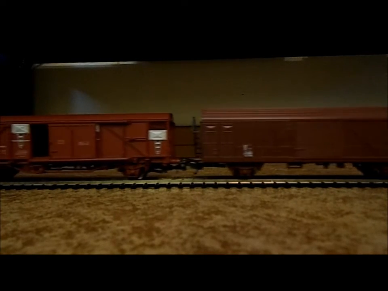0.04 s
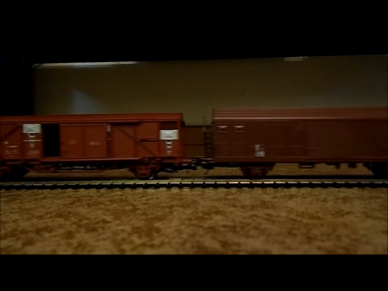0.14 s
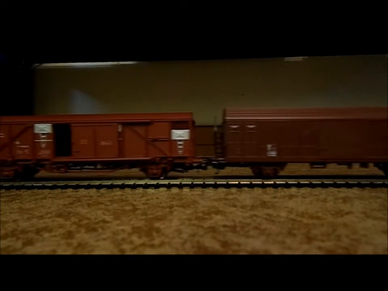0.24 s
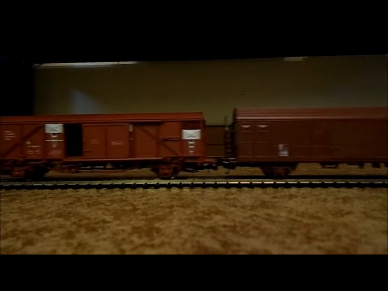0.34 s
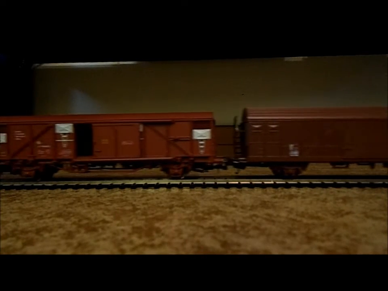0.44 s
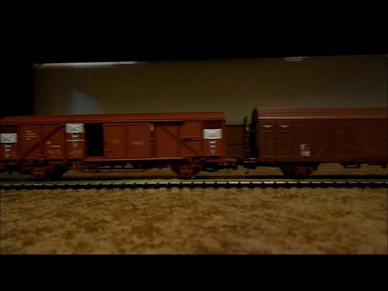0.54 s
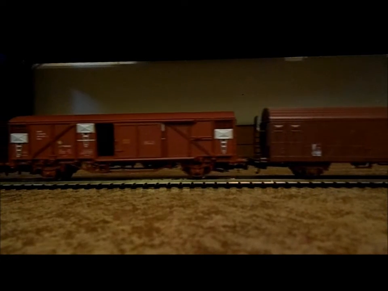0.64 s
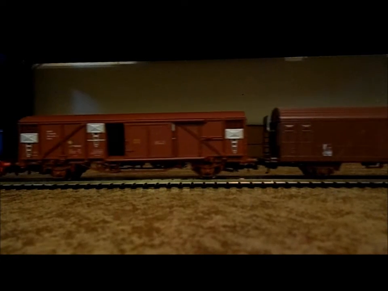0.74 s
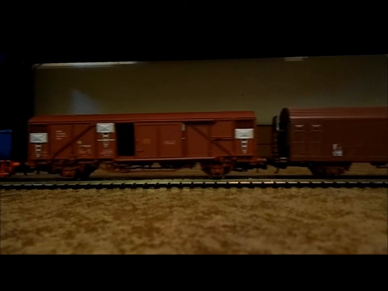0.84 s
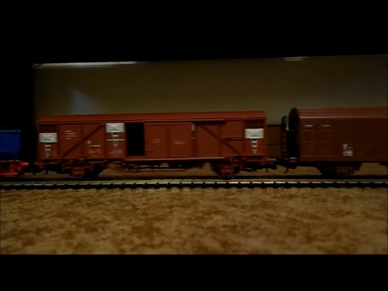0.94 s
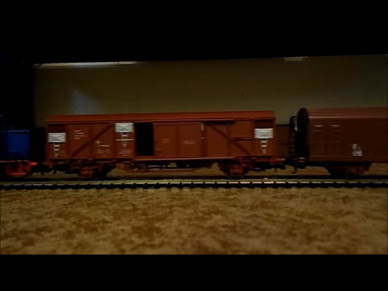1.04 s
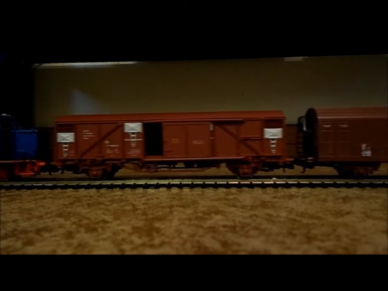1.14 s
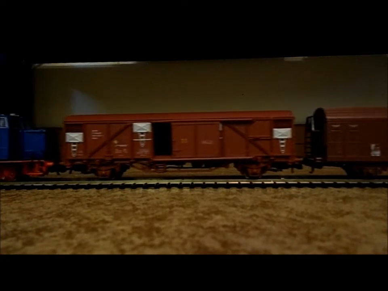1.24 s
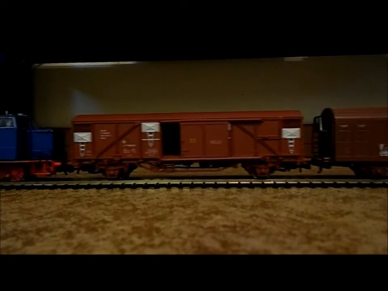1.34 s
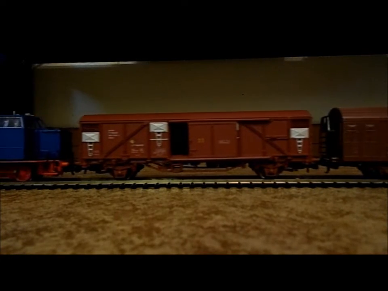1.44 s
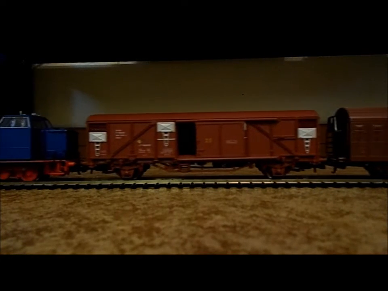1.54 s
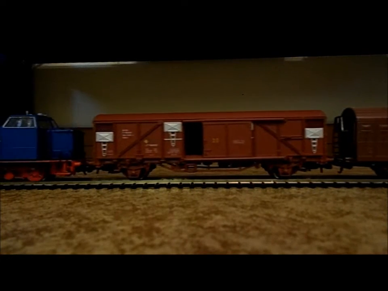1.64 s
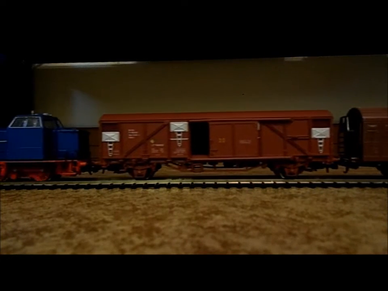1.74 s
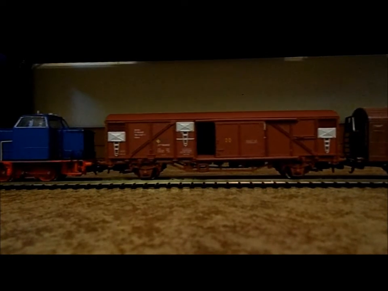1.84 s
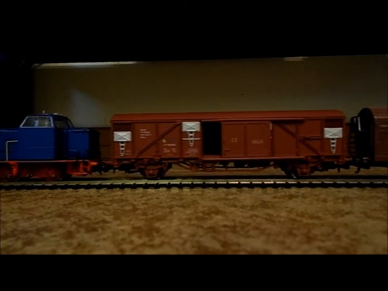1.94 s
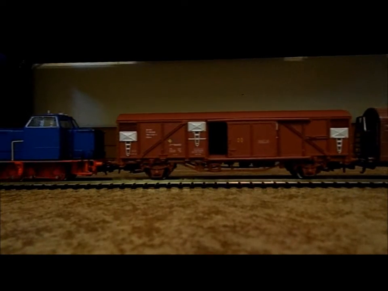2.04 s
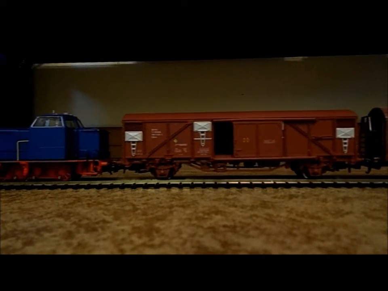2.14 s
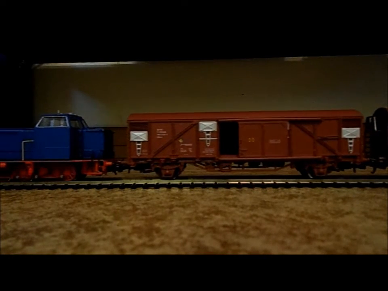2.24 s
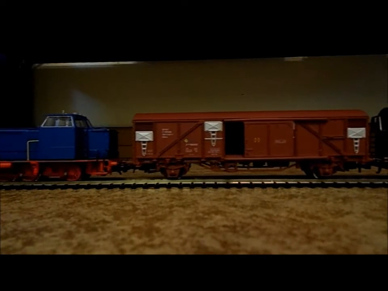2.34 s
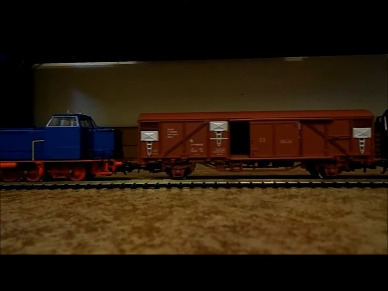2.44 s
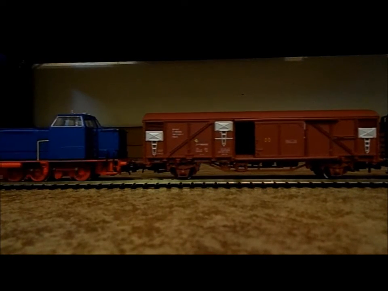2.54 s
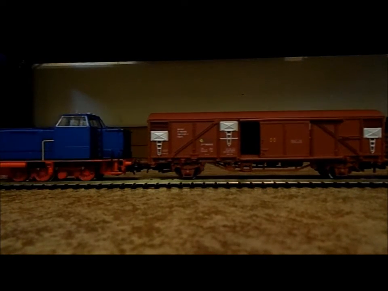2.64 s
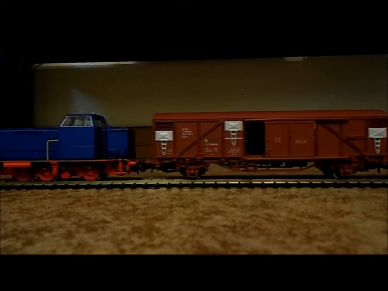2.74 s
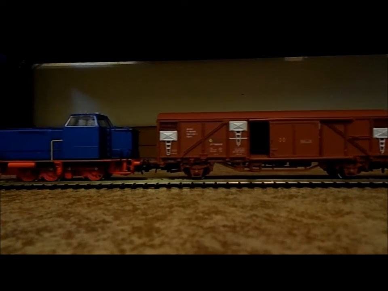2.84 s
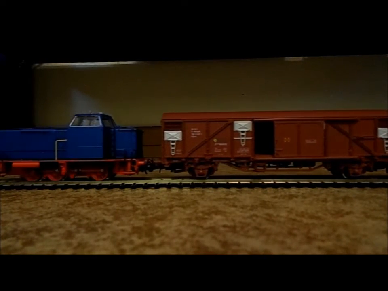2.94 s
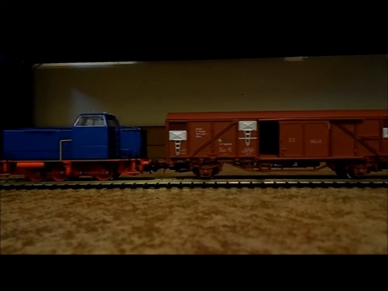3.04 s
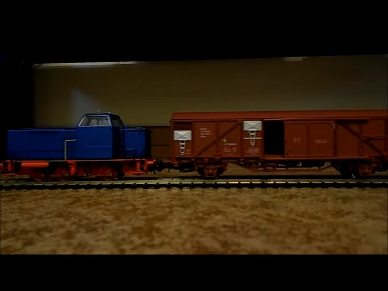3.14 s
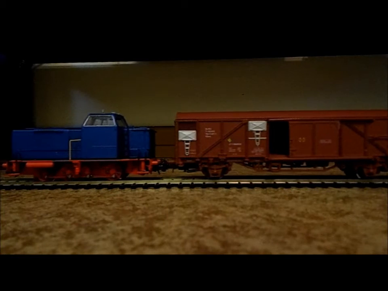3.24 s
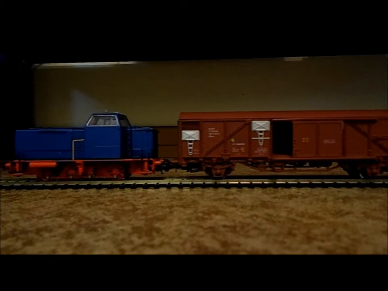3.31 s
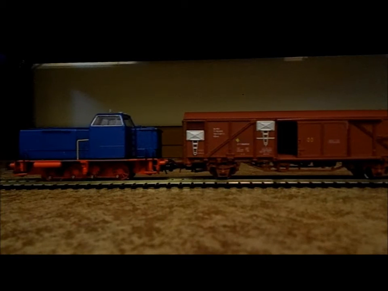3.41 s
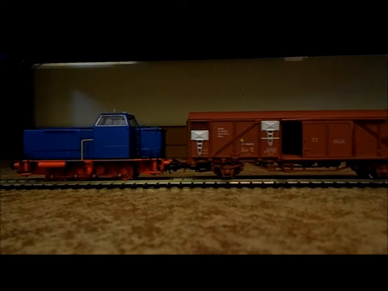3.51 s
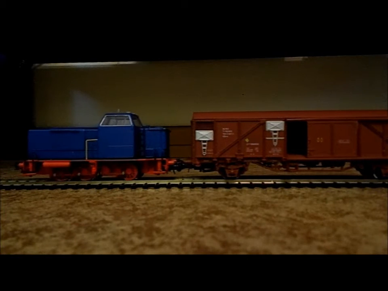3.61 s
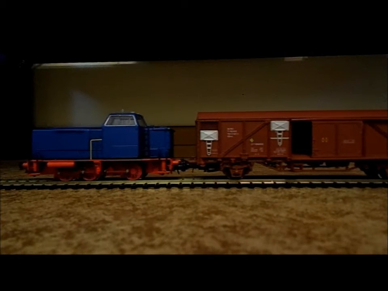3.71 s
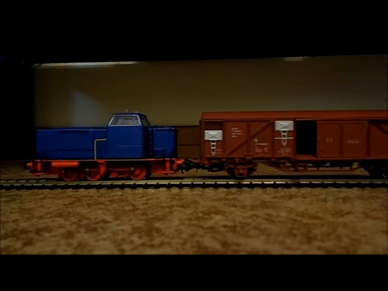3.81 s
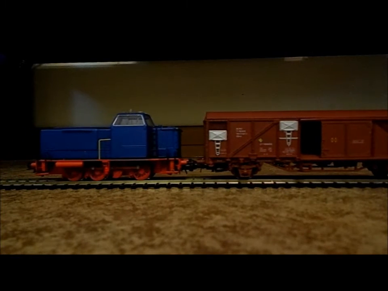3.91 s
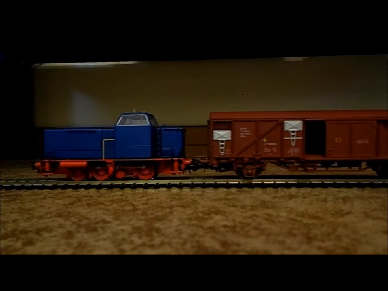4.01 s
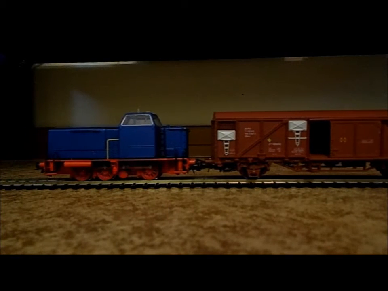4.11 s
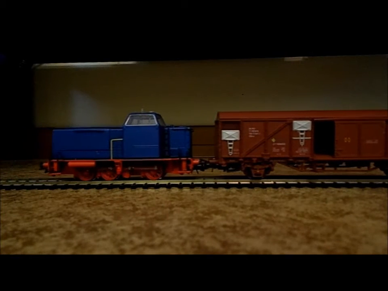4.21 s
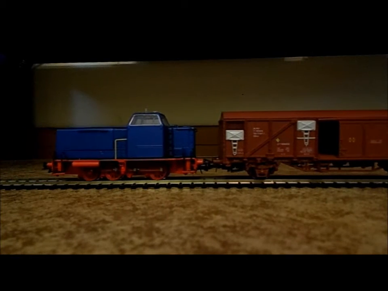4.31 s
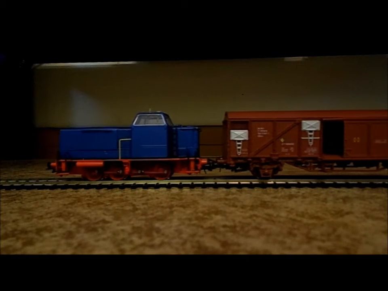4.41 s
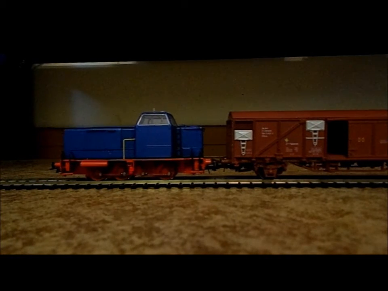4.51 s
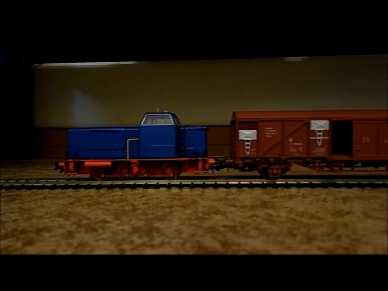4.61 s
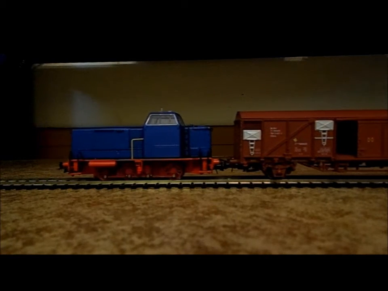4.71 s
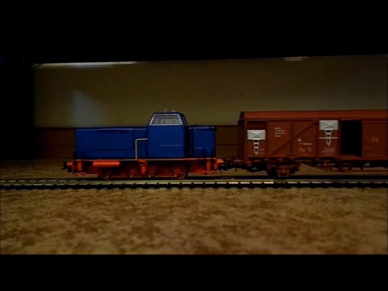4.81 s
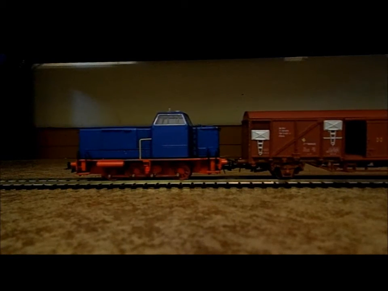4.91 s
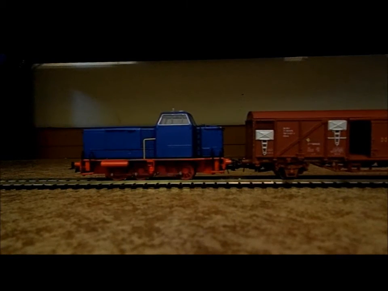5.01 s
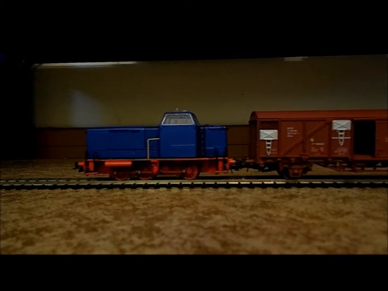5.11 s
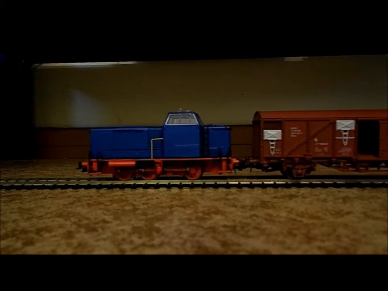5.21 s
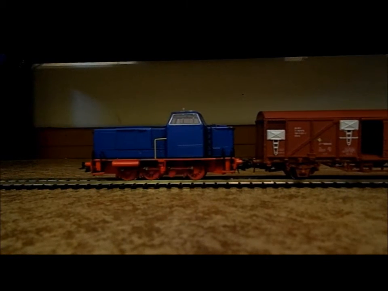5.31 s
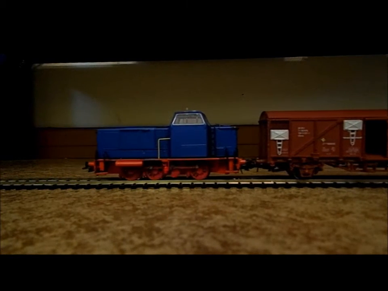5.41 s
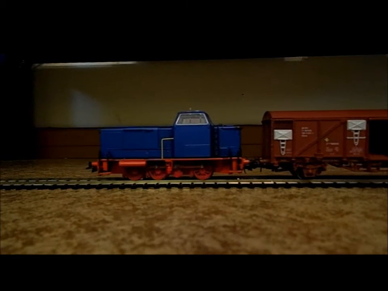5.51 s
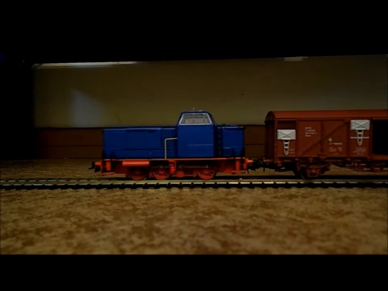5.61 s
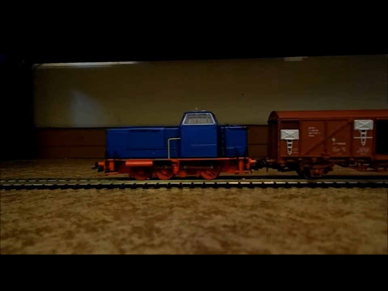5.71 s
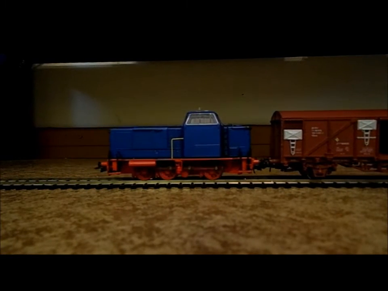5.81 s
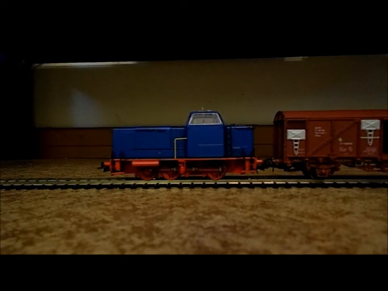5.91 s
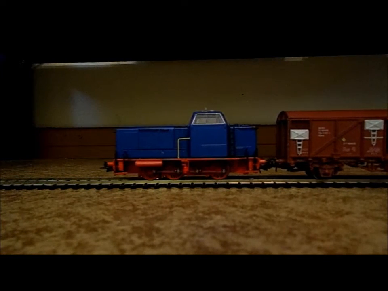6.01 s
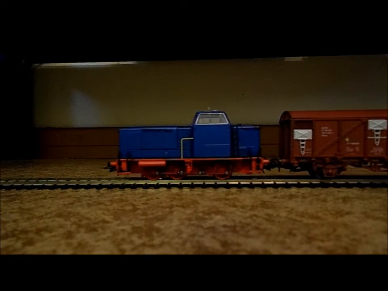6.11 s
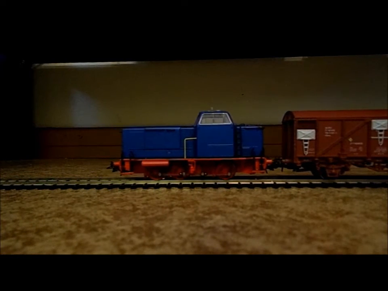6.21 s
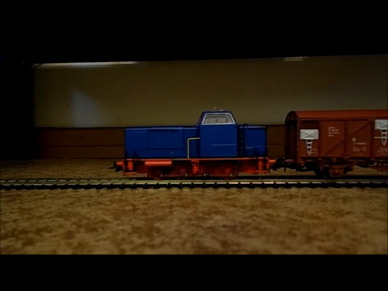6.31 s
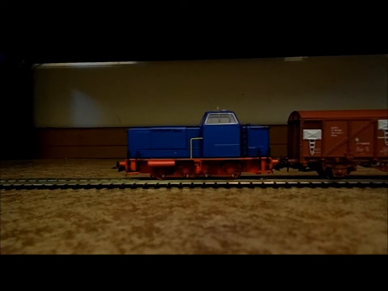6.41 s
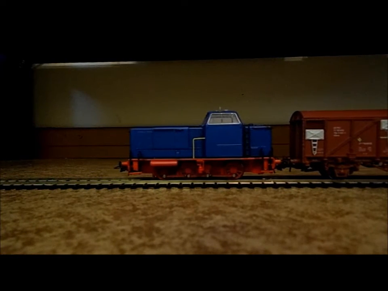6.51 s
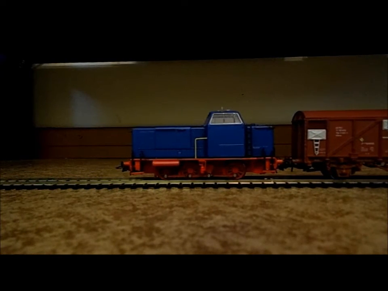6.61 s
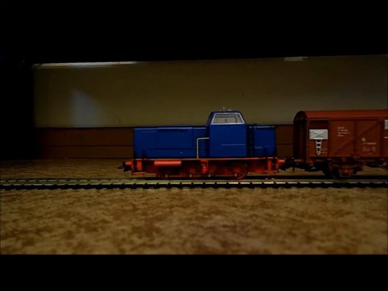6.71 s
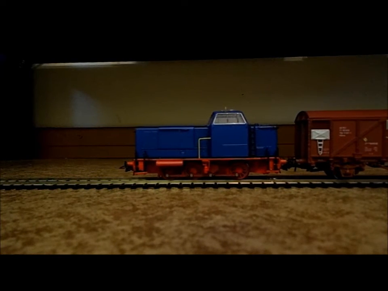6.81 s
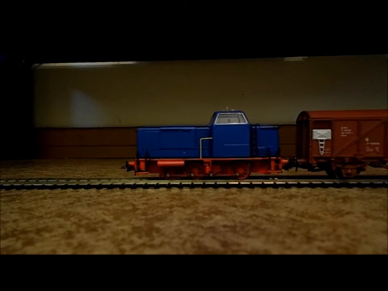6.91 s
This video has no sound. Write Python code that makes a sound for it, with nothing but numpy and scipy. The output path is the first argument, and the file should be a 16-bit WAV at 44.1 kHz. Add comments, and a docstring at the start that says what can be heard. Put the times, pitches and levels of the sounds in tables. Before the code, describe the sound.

A model locomotive's electric motor buzzes at a steady pitch while brushes scrape and wheels roll, slowing to a crawl over a deep throbbing drone.

```python
"""A model locomotive's motor buzzes at multiples of its chopped current, with side tones from five armature slots.
Filtered noise gives brushes that scrape and tick and wheels that roll and knock on rail joints, slowing to a crawl.
A gliding sine with a weak octave makes a deep far-off drone, and a steadier hum beats with it. Thin steady tones,
a low rumble and hiss lie beneath, and short swelling sines make clock-like pips."""
import sys
import numpy as np
from scipy import signal
from scipy.io import wavfile
from scipy.ndimage import uniform_filter1d

SR = 44100
rng = np.random.default_rng(int(sys.argv[2]) if len(sys.argv) > 2 else 0)


def gain_from_db(level_db):
    """Convert decibel levels to linear amplitude factors (20 dB per decade)."""
    decades = np.asarray(level_db, float) / 20
    return 10 ** decades


def store_wav(level_fs):
    """Save 16-bit WAV to argv[1]."""
    pcm = np.round(np.clip(np.atleast_2d(level_fs), -1, 1) * 32767)
    wavfile.write(sys.argv[1], SR, pcm.T.astype(np.int16))


N = 306495  # length in samples

# Rotation of the motor shaft. Each row: time in seconds, speed in turns per second.
SHAFT_SPEED = [(0.0, 83.3), (0.62, 78.23), (1.24, 64.67), (1.74, 47.53), (2.11, 40.49), (2.73, 33.16),
               (3.23, 35.24), (3.35, 31.98), (3.6, 33.38), (4.1, 28.82), (4.34, 30.91), (4.59, 31.1),
               (4.96, 29.18), (5.21, 26.35), (5.58, 24.61), (6.33, 23.03), (6.58, 15.22), (6.95, 11.26)]
# Low multiples of the chopping rate. Each row: multiple, level in dB relative to the buzz level.
BUZZ_MULTIPLES = [(1, -15), (2, -18), (3, -16.5), (4, -1), (5, -7.5), (6, -14), (7, -20), (8, -11.5),
                  (9, -1), (10, -6), (11, -3), (12, -9), (13, -9), (14, -13.5), (15, -22.5), (16, -29),
                  (17, -17.5), (18, -18), (19, -21), (20, -25), (21, -18.5), (22, -28.5), (23, -19),
                  (24, -21.5)]
# Envelope of the higher multiples. Each row: frequency in Hz, level in dB before the shell's coloration.
BUZZ_TREBLE = [(3900, -77), (4600, -95), (5500, -77.5), (6300, -84.5), (6900, -90), (7900, -76),
               (9000, -83.5), (10000, -82), (11500, -86), (12900, -82), (13600, -94), (14600, -84),
               (15600, -80.5)]
# Coloration by the shell as the engine rolls into the open and then labours. Each row: time in seconds,
# gain in dB near 1.4 kHz, near 1.7 kHz and near 2.1 kHz, gain of the slot ripple in dB.
SHELL_GAINS = [(0, -5, -18, -9, -5), (.7, -7.5, -21, -3, -3), (1.3, -1.5, -5, -14, 0.5),
               (2, -5.5, -4, -5.5, -4), (3.3, -3.5, -1, -10.5, -9), (3.8, -8, 1, -3.5, -2),
               (4.3, -6, -1, -12, -3), (4.8, -3, -0.5, -8.5, -3), (6.2, -5.5, -4.5, -2.5, -4),
               (6.4, -3.5, -2, 1, -3), (6.95, -4, -3, 1, -4.5)]
# Side tones of slot ripple on the buzz. Each row: frequency in Hz, level in dB before speed and shell act.
SLOT_RIPPLE = [(500, -84), (1000, -78), (1300, -73), (1420, -65), (1520, -66), (1650, -71), (1800, -71),
               (2100, -73), (2300, -79), (2600, -90), (3500, -95)]
# Spectrum of loose parts shaken by each pulse. Each row: frequency in Hz, relative density in dB per Hz.
RATTLE_SPECTRUM = [(900, -3), (1500, 18), (2200, -3), (3000, -1), (8000, -17), (15500, 0)]
# Resonances of small metal parts at the brushes. Each row: frequency in Hz, nominal width in Hz,
# relative gain in dB under the scrape, relative gain in dB under the tick.
BRUSH_RESONANCES = [(5150, 960, -4.5, -8), (7530, 2000, -5, -14), (8990, 1640, 2, -10), (9700, 1430, 2, -8),
                    (12020, 650, 1.5, -4), (13600, 1100, -31, -27)]
# Tick of the high segment. Each row: time in seconds, level in dB.
TICK_LEVEL = [(0, -80), (.9, -70), (1.5, -65.5), (2.2, -66), (5, -67.5), (6.2, -68.5), (6.95, -86)]
# Spectrum of rolling noise. Each row: frequency in Hz, relative density in dB per Hz.
ROLL_SPECTRUM = [(100, 7.5), (250, -6.5), (500, -0.5), (900, 2.5), (1500, -9.5), (2500, -7), (3500, -13),
                 (7000, -18), (15500, -11)]
# Deep drone. Each row: time in seconds, frequency in Hz, rms level in dB.
DRONE_GLIDE = [(0.0, 34.88, -72.8), (0.09, 31.34, -38.8), (0.56, 33.23, -24.4), (0.77, 30.87, -33.7),
               (1.05, 34.21, -20.3), (1.59, 37.34, -33.8), (2.11, 37.59, -28.9), (2.95, 38.28, -30.9),
               (3.0, 39.48, -33.5), (3.64, 41.97, -42.1), (4.14, 41.11, -40.3), (4.53, 38.2, -27.9),
               (4.91, 42.88, -45.2), (5.11, 40.93, -39.9), (5.85, 38.78, -38.6), (5.9, 39.97, -48.3),
               (6.21, 37.59, -33.8), (6.39, 38.66, -38.9), (6.74, 34.87, -27.9), (6.95, 37.19, -30.0)]
# Second partial of the drone, loudest at low pitch. Each row: frequency of the partial in Hz, rms level in dB.
DRONE_OCTAVE = [(60, -52), (66, -54.5), (70, -62), (74, -72), (77, -66.5), (84, -65.5)]
# Fainter, steadier hum that beats with the drone. Each row: time in seconds, frequency in Hz, rms level in dB.
UNDER_HUM = [(0.0, 34.44, -41.5), (1.0, 32.99, -76.1), (1.7, 33.45, -46.8), (3.0, 32.92, -45.2),
             (4.0, 34.06, -51.0), (5.0, 34.09, -45.9), (6.0, 32.96, -54.9), (6.95, 34.24, -46.1)]
# Steady thin tones. Each row: frequency in Hz, rms level in dB.
THIN_TONES = [(60, -80), (299.7, -67.5), (12932, -73)]
# Spectrum of the background hiss. Each row: frequency in Hz, relative density in dB per Hz.
HISS_SPECTRUM = [(29, -18.5), (50, 2), (68, -9.5), (91, -14.5), (128, -17.5), (304, -22), (568, -25.5),
                 (625, -24.5), (705, -27.5), (776, -26.5), (1040, -30), (1420, -22.5), (2520, -33),
                 (15700, -39)]
# Wheels on rail joints. Each row: start in seconds, peak in dB, middle frequency in Hz, decay time in ms.
RAIL_KNOCKS = [(.045, -49, 600, 9), (.125, -51, 1200, 9), (.285, -48, 950, 14), (.299, -45, 6300, 3),
               (.36, -47, 450, 9), (.512, -45, 500, 9), (.516, -51, 1400, 9), (.69, -50, 600, 9),
               (3.293, -46, 1400, 10), (3.296, -46, 3200, 8), (5.061, -47, 5000, 3), (5.061, -52, 2500, 4),
               (5.076, -49, 3200, 4)]
# Clock-like pips. Each row: start in seconds, level in dB of the lower ring, level in dB of the upper ring.
PIP_TIMES = [(.118, -51, -54), (.95, -55, -66), (1.95, -53.5, -62), (3.935, -53.5, -65), (4.935, -59, -54),
             (5.936, -52, -54)]

CHOP_HZ, SLOTS = 158.346, 5  # current pulses a second, armature slots


def evened(x):
    """Normalization of power: the signal is scaled to rms 1."""
    return x / np.sqrt(np.mean(x ** 2) + 1e-20)


def read(points, hz):
    """Spectral interpolation: straight lines in dB on a log-frequency axis."""
    f, value = np.transpose(points)
    return np.interp(np.log(hz + 1), np.log(f + 1), value)


def curves(rows, step=1):
    """Linear interpolation in time: every column of a table at every step-th sample."""
    s, *columns = np.transpose(rows)
    return [np.interp(np.arange(0, N, step) / SR, s, c) for c in columns]


def slow(count, width):
    """Low-passed chance: twice-averaged random rows, one value every 256 samples."""
    x = rng.standard_normal((count, N // 256 + 401))
    for _ in range(2):
        x = uniform_filter1d(x, width)
    return evened(x[:, 200:-200])


def fine(x):
    """Linear interpolation from one value every 256 samples to every sample."""
    return np.interp(np.arange(N) / 256, np.arange(len(x)), x)


def resonate(x, hz, width):
    """Resonance of peak gain 1, applied twice for steep skirts."""
    b, a = signal.iirpeak(hz, hz / width, SR)
    return signal.lfilter(b, a, signal.lfilter(b, a, x))


def noise(points, patchy_db):
    """Shaped random noise: chance short-time spectra with drifting patches, scaled to rms 1."""
    real, imaginary, patches = rng.standard_normal((N // 512 + 5, 1025, 3)).T
    patches = uniform_filter1d(patches, size=20, axis=0)
    patches = evened(uniform_filter1d(patches, size=6, axis=1))
    shape_db = read(points, np.fft.rfftfreq(2048, 1 / SR))[:, None]
    spectra = (real + 1j * imaginary) * gain_from_db(shape_db + patchy_db * patches)
    return evened(signal.istft(spectra, nperseg=2048, noverlap=1536)[1][:N])


def since(cycles):
    """Phase as elapsed time: samples since the cycle count last passed a whole number."""
    sample = np.arange(N)
    passed = np.diff(np.floor(cycles), prepend=0) > 0
    return sample - np.maximum.accumulate(sample * passed)


def shell_db(hz, low_db, middle_db, high_db):
    """Coloration by three broad formants, each a bell-shaped gain in dB over frequency."""
    low = low_db * np.exp(-((hz - 1400) / 150) ** 2)
    middle = middle_db * np.exp(-((hz - 1680) / 170) ** 2)
    high = high_db * np.exp(-((hz - 2150) / 330) ** 2)
    return low + middle + high


def motor_buzz(speed, turns):
    """Harmonics of periodic current pulses, modulated by room reflections and flanked by slot side tones."""
    buzz_db = -56.5
    lag_s, lag_from_hz = .005, 1800  # low part of each pulse trails the high part, by this much at the bottom
    count = int(15700 / CHOP_HZ)
    chop = 2 * np.pi * CHOP_HZ * np.arange(N) / SR
    *formants_db, ripple_db = curves(SHELL_GAINS, step=256)
    high_db = formants_db[-1]
    coarse_speed = speed[::256]
    echo = uniform_filter1d(slow(count=2 * count, width=41), size=2, axis=0)  # neighbours drift alike
    scatter, out = rng.standard_normal(count), np.zeros(N)
    for k in range(1, count + 1):
        hz = k * CHOP_HZ
        is_low = k <= len(BUZZ_MULTIPLES)
        db = buzz_db + (BUZZ_MULTIPLES[k - 1][1] if is_low else read(BUZZ_TREBLE, hz) - buzz_db)
        wet = np.clip((hz / 4500) ** 3, .01, .75)  # drifting reflections cancel short waves more
        path = np.sqrt(1 - wet) + np.sqrt(wet) * (echo[k - 1] + 1j * echo[-k])
        level = gain_from_db(db + shell_db(hz, *formants_db)) * path
        # the part near 2 kHz arrives as one stroke, so its phases scatter least
        spread = .35 if 1700 < hz < 2500 else 1.1 if hz < 1700 else .7
        phase = k * chop + spread * scatter[k - 1]
        phase += np.pi * lag_s * max(lag_from_hz - hz, 0) ** 2 / lag_from_hz
        out += fine(level.real) * np.cos(phase) - fine(level.imag) * np.sin(phase)
        if not is_low:
            continue
        for side, side_db in ((1, 0), (-1, -coarse_speed / 9)):  # the lower side weakens at speed
            side_hz = abs(hz + side * SLOTS * coarse_speed)
            tone_db = read(SLOT_RIPPLE, side_hz) + side_db + ripple_db + .5 * high_db * (side_hz > 1750)
            out += fine(gain_from_db(tone_db)) * np.cos(phase + side * SLOTS * 2 * np.pi * turns)
    return np.sqrt(2) * out


def rattle():
    """Amplitude modulation: noise of loose parts jumps with each current pulse and decays until the next."""
    pulse_part = CHOP_HZ * np.arange(N) / SR % 1
    gate = np.exp(-pulse_part / 0.5)
    high_db = curves(SHELL_GAINS, step=256)[2]
    return gain_from_db(-69.5 + .5 * fine(high_db)) * evened(gate) * noise(RATTLE_SPECTRUM, patchy_db=0.0)


def brush_scrape(speed, turns):
    """Friction noise pulsing with each segment excites the resonances of small metal parts."""
    level_db = -56.5 + 7.5 * np.log2(speed / 80)  # falls 7.5 dB as the speed halves
    level_db += 1.5 * np.exp(-((np.arange(N) / SR - 0.59) / 0.21) ** 2)  # one swell early on
    from_gap = since(SLOTS * turns)
    segment = .3 + np.exp(-from_gap / (.0009 * SR))
    once_a_turn = 1 + 0.12 * np.cos(2 * np.pi * (turns - .3))
    snap = 1.2 * (from_gap == 0)  # at each gap
    scrape = segment * once_a_turn * (rng.standard_normal(N) + snap)
    rung = sum(gain_from_db(db) * resonate(scrape, hz, width) for hz, width, db, _ in BRUSH_RESONANCES)
    return gain_from_db(level_db) * evened(rung)


def brush_tick(turns):
    """Impact once a turn: a short burst of grit and spring tone excites the same resonances."""
    spring_hz, spring_size = 8910, 0.97  # size against the grit
    level_db, = curves(TICK_LEVEL)
    size_db = 0.31 * rng.standard_normal(int(turns[-1]) + 1)[turns.astype(int)]
    ring = spring_size * np.cos(2 * np.pi * spring_hz * since(turns + 0.16) / SR)
    burst = np.exp(-(since(turns + 0.17) / SR / 0.0017 - 2.2) ** 2)
    tick = gain_from_db(size_db) * burst * (rng.standard_normal(N) + ring)
    rung = sum(gain_from_db(db) * resonate(tick, hz, 0.98 * width) for hz, width, _, db in BRUSH_RESONANCES)
    return gain_from_db(level_db) * evened(rung)


def rolling(speed):
    """Roughness excitation: noise grows with speed and is modulated by chance flaws in wheel and rail."""
    bumps = (rng.random(N) < speed / 2 / SR) * rng.random(N)  # flaws pass more often at speed
    decay = np.exp(-np.arange(1500) / (0.006 * SR))
    clatter = 1 + 0.5 * signal.oaconvolve(bumps, decay)[:N]
    level_db = -52.5 + 9.5 * np.log2(speed / 80)  # falls 9.5 dB as the speed halves
    return gain_from_db(level_db) * evened(clatter) * noise(ROLL_SPECTRUM, patchy_db=3.0)


def drone():
    """Frequency modulation and beating: a gliding tone with a weak octave beside a nearby steadier hum."""
    (hz, db), (under_hz, under_db) = curves(DRONE_GLIDE), curves(UNDER_HUM)
    phase = 2 * np.pi * np.cumsum(hz) / SR
    octave_db = read(DRONE_OCTAVE, 2 * hz) + 1.1 * fine(slow(count=1, width=9)[0])
    partials = gain_from_db(db) * np.sin(phase) + gain_from_db(octave_db) * np.sin(2 * phase)
    under = gain_from_db(under_db) * np.sin(2 * np.pi * np.cumsum(under_hz) / SR)
    return np.sqrt(2) * (partials + under)


def rumble():
    """Narrow-band noise: a resonance near the drone's pitch passes random noise without a clear pitch."""
    return gain_from_db(-56.0) * evened(resonate(rng.standard_normal(N), hz=35.0, width=7.0))


def thin_tones():
    """Superposition of steady sinusoids."""
    t = np.arange(N) / SR
    return np.sqrt(2) * sum(gain_from_db(db) * np.sin(2 * np.pi * hz * t) for hz, db in THIN_TONES)


def hiss():
    """Broadband background noise with a density that falls toward the treble."""
    return gain_from_db(-53) * noise(HISS_SPECTRUM, patchy_db=1.4)


def rail_knocks():
    """Impacts at rail joints: band-passed noise with a rounded onset and exponential decay."""
    t, out = np.arange(3000) / SR, np.zeros(N)
    for s, db, hz, ms in RAIL_KNOCKS:
        b, a = signal.butter(2, [hz / 2.58, hz * 1.48], "band", fs=SR)
        grit = signal.lfilter(b, a, rng.standard_normal(len(t)))
        knock = grit * (1 - np.exp(-t / 0.0053)) * np.exp(-1000 * t / ms)
        out[round(s * SR):][:len(t)] += gain_from_db(db) * knock / abs(knock).max()
    return out


def pips():
    """Tone bursts: two sinusoids near 2 kHz under bell-shaped envelopes, the upper one a little later."""
    t, out = np.arange(3000) / SR, np.zeros(N)
    for s, *levels_db in PIP_TIMES:
        for db, hz, late in zip(levels_db, (1934, 2050), (.012, .024)):  # envelope peaks this many seconds in
            swell = np.exp(-((t - late) / 0.0075) ** 2)
            out[round(s * SR):][:len(t)] += gain_from_db(db) * swell * np.sin(2 * np.pi * (hz * t + rng.random()))
    return out


def scene():
    """Superposition of all sources at one microphone."""
    speed, = curves(SHAFT_SPEED)
    turns = .765 + np.cumsum(speed) / SR  # part of a turn is already made at the start
    engine = motor_buzz(speed, turns) + rattle() + brush_scrape(speed, turns) + brush_tick(turns)
    wheels = rolling(speed) + rail_knocks()
    background = drone() + rumble() + thin_tones() + hiss()
    return (engine + wheels + background + pips())[None]


def low_pass(x):
    """Removes everything above the highest recorded frequency."""
    return signal.sosfilt(signal.butter(12, 16310, fs=SR, output="sos"), x)


def record(dry):
    """Band limitation: a steep linear-phase low-pass ends the spectrum of the finished mix."""
    edge = signal.firwin(1023, 15740, window=("kaiser", 9), fs=SR)  # edge in Hz
    limited = signal.oaconvolve(dry, edge[None], "same")
    return low_pass(limited)


dry = scene()
out = record(dry)
store_wav(out)
```